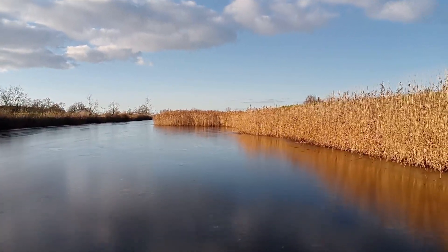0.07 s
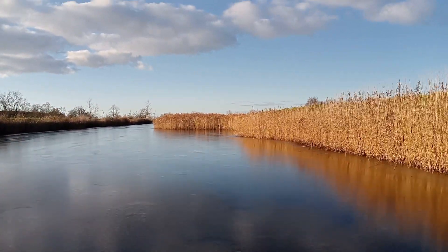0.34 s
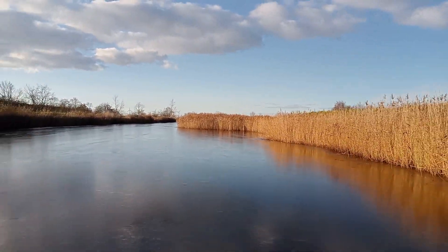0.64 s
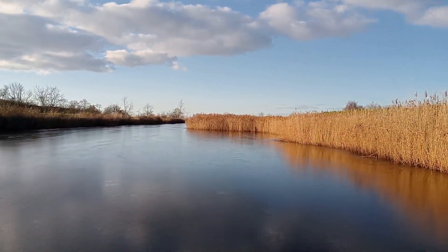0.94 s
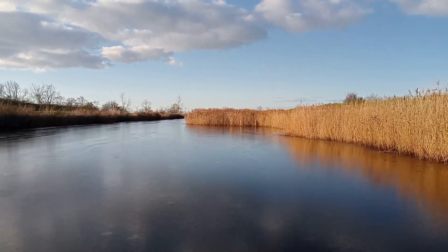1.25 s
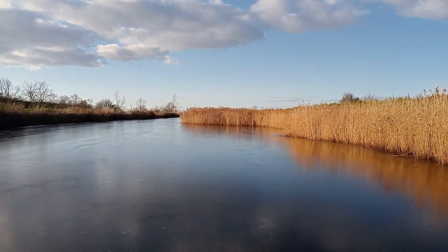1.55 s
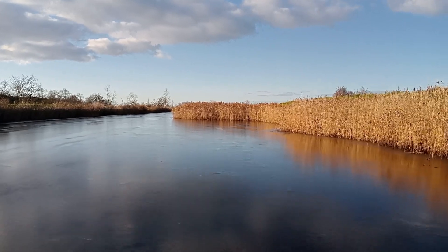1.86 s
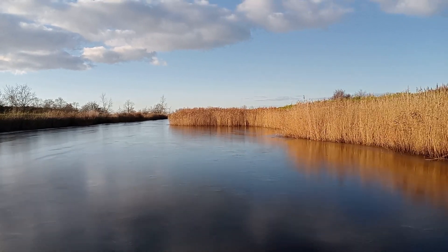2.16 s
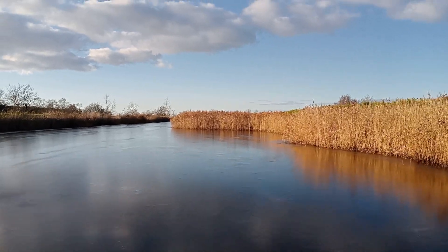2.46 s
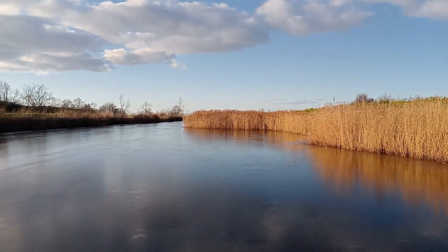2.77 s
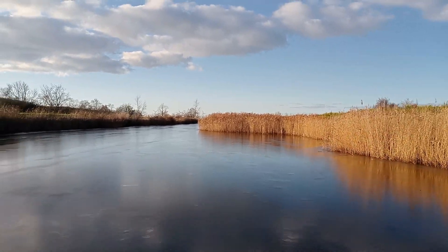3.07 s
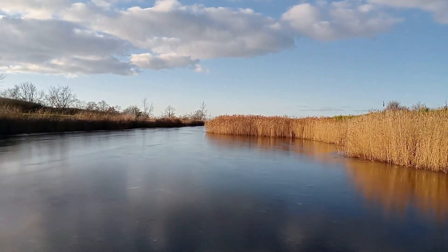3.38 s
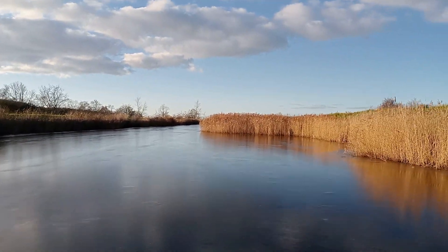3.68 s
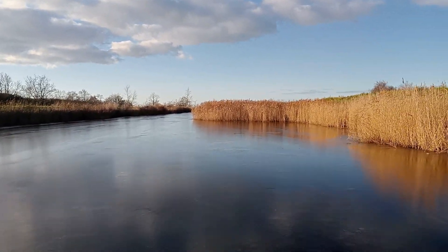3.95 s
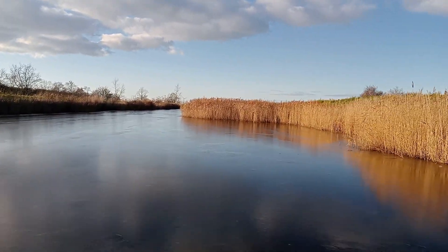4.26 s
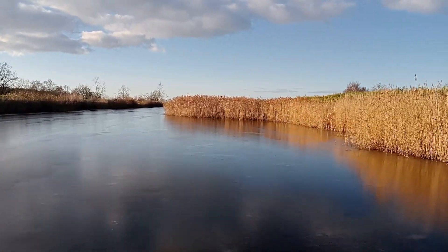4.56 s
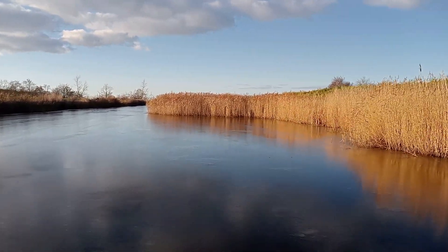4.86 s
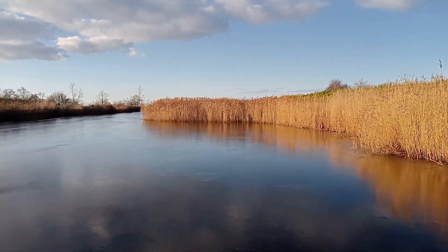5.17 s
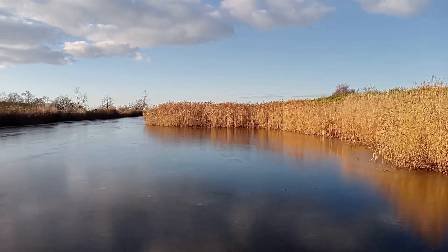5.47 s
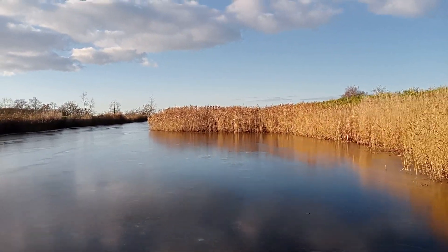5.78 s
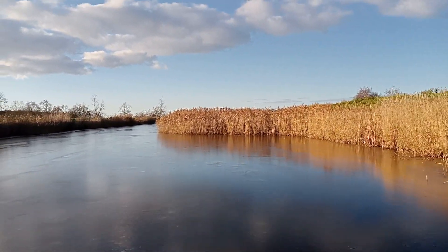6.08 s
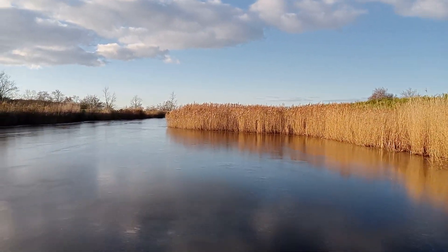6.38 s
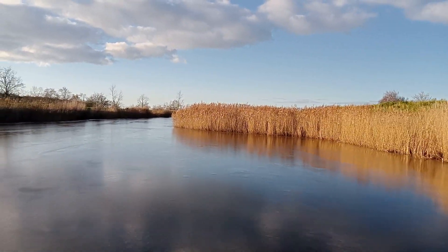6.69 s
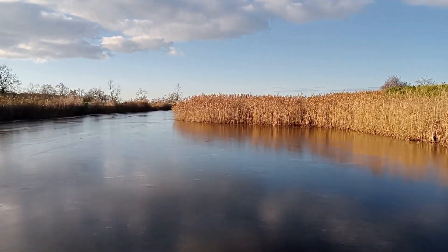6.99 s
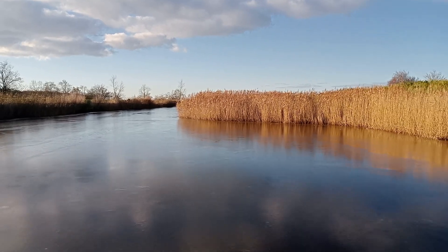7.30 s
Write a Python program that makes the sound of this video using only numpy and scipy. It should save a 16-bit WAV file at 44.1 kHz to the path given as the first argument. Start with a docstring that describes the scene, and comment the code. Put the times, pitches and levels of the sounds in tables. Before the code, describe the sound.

Ice skates travel over thin ice, heard close and without echo, with a faint gritty gliding hiss and uneven low wind rumble throughout. From the start the ice cracks in sharp snaps, each a very short falling chirp, thickest and loudest between 1.2 and 2.5 seconds. A blade rasps at about 0.5 to 0.9 seconds. The other blade chatters in a fast, ringing metallic stutter from 1.7 to 2.2 seconds. The skates clack around 2.8 seconds, followed by a lone crack, a softer rasp until 3.5 and a sharp clack at 3.7. A longer chattering push runs from 4.2 to 5.1 seconds, ending in a scrape. Clacks and one more crack come near 5.7, then a strong, crunchy rasp from 6.1 to 6.8. Sharp clacks follow at 7 and 7.3 seconds. Gusts bump the microphone around 1.2, 1.9, 3.6 and 5.1 seconds.

```python
"""Skating on thin black ice

A skater carries the microphone along a canal. The sheet cracks underfoot, and each crack arrives as
a short falling chirp because high bending waves outrun low ones. One blade chatters through its push,
gripping and slipping; the other rasps as it shaves the ice. The skates clack between strides,
the glide hisses and the airstream buffets the microphone."""
import sys
import numpy as np
from scipy import signal
from scipy.fft import rfft, irfft
from scipy.io import wavfile
from scipy.ndimage import uniform_filter1d

SR = 44100
rng = np.random.default_rng(int(sys.argv[2]) if len(sys.argv) > 2 else 0)


def put_to_file(sound):
    """Save the sound as 16-bit audio at rate SR, in the file named by the first command-line argument."""
    columns = np.atleast_2d(sound).T  # one column per channel
    safe = np.clip(columns, -1, 1)
    whole_steps = np.round(safe * 32767)
    wavfile.write(sys.argv[1], SR, whole_steps.astype(np.int16))


N = 323253
TIME = np.arange(N) / SR


def from_db(db):
    """Decibels to gain."""
    return 10 ** (np.asarray(db) / 20)


def rms_one(x):
    """Scale to unit power."""
    return x / np.sqrt(np.mean(x ** 2) + 1e-20)


def in_time(rows):
    """Each column of an automation curve at every sample."""
    times, *columns = np.transpose(rows)
    return [np.interp(TIME, times, column) for column in columns]


def during(rows, fade_s=0.01):
    """A gate that is open while a curve lasts."""
    return np.clip(np.minimum(TIME - rows[0][0], rows[-1][0] - TIME) / fade_s, 0, 1)


def held(start, end, attack_s, release_s):
    """Envelope: attack before the start, hold, release after the end."""
    attack = np.maximum(start - TIME, 0) / attack_s
    release = np.maximum(TIME - end, 0) / release_s
    return np.exp(-np.minimum(attack + release, 20))


def add(track, start_s, sound):
    """Mix a short sound into a track."""
    start = max(round(start_s * SR), 0)
    track[start:start + len(sound)] += sound[:max(N - start, 0)]


def gain_at(spectrum, hz):
    """Gain of an EQ curve, falling 20 dB per octave beyond its ends."""
    points_hz, db = np.transpose(spectrum)
    octave, points = np.log2(np.maximum(hz, 1)), np.log2(points_hz)
    beyond = np.abs(octave - np.clip(octave, points[0], points[-1]))
    return from_db(np.interp(octave, points, db) - 20 * beyond)


def colour(x, spectrum, size=4096):
    """Minimum-phase EQ that keeps the power of white noise."""
    cepstrum = irfft(np.log(gain_at(spectrum, np.fft.rfftfreq(size, 1 / SR))))
    cepstrum[1:size // 2] *= 2
    cepstrum[size // 2 + 1:] = 0
    response = irfft(np.exp(rfft(cepstrum)))
    return signal.oaconvolve(x, response / np.linalg.norm(response))[:N]


def wobble(depth_db, rate_hz):
    """A randomly wandering gain with unit power."""
    knots = rng.standard_normal(N // 20)
    drift = rms_one(np.interp(TIME * rate_hz, np.arange(len(knots)), knots))
    return rms_one(from_db(depth_db * drift))


def burst(decay_s, rise_s, size):
    """Noise that swells quickly and dies away."""
    t = np.arange(size) / SR
    return (1 - np.exp(-t / rise_s)) * np.exp(-t / decay_s) * rng.standard_normal(size)


def crumble(impulses, decay_s, rise_s=0.001):
    """The energy of each impulse breaks up into a burst of noise."""
    power = impulses ** 2
    for time_s in (rise_s, decay_s):
        pole = np.exp(-2 / (time_s * SR))
        power = signal.lfilter([1 - pole], [1, -pole], power + 1e-18)
    return np.sqrt(power) * rng.standard_normal(N)


def slip_train(per_s, unevenness, spread_db, count=4000):
    """Stick and slip: impulses at uneven gaps, with unit power."""
    timing, strength = rng.standard_normal((2, count))
    gaps = np.exp(unevenness * timing - unevenness ** 2 / 2)
    at = (np.cumsum(gaps) / per_s * SR).astype(int)
    train = np.zeros(N)
    train[at[at < N]] = from_db(spread_db * np.clip(strength, -2, 2))[at < N]
    return rms_one(train)


def wandering_contact(x, depth_db, size=256):
    """The point of contact wanders along the runner, so narrow bands swell and fade irregularly."""
    spectrum = signal.stft(x, nperseg=size)[2]
    patches = uniform_filter1d(rng.standard_normal(spectrum.shape), size=2, axis=0)
    patches = rms_one(uniform_filter1d(patches, size=70, axis=1))
    return signal.istft(spectrum * rms_one(from_db(depth_db * patches)), nperseg=size)[1][:N]


# friction bed of the gliding skate: time_s, level_db
GLIDE_LEVEL = [(0, -52), (0.9, -45.5), (1.38, -52), (2.3, -42.5), (2.58, -52.5), (2.85, -56.5),
               (3.25, -50.5), (3.5, -49), (4.05, -51), (4.3, -45), (4.6, -48), (5.2, -48.5), (5.62, -50.5),
               (5.9, -48.5), (6.55, -47.5), (7.1, -54.5), (7.33, -51.5)]
# sideways scuffs, ever harder until the blade lifts: start_s, lift_s, hiss_db, spray_db
SCUFFS = [(0.06, 0.15, -44.5, -44.5), (0.4, 0.536, -47, -51), (1.45, 1.934, -39.5, -59),
          (2.325, 2.52, -45.5, -48), (3.565, 3.893, -47, -51), (5.215, 5.55, -45, -44),
          (6.84, 7.058, -44, -56), (7.307, 7.336, -37, -30)]
# blade hiss, fine ice spray and the runner's murmur: freq_hz, gain_db
HISS_EQ = [(2500, 19), (3500, -2), (5000, 9.5), (6300, -4.5), (7300, 8), (8200, 6), (9300, 15.5),
           (10800, 4), (12500, 5.5), (15000, -70)]
SPRAY_EQ = [(6000, -4), (10000, -6), (12500, -17), (13800, -14), (15300, -14), (16000, -18)]
RUNNER_EQ = [(300, -26), (550, -10), (1000, -6), (1600, -2), (1830, 3), (1980, -2.5), (2180, -1),
             (2550, -5), (3400, -5), (6000, -19.5)]


def glide(hiss_db=-1, spray_db=-5, runner_db=5, scuff_swell_db=8.5, tick_gain=0.91):
    """Steel running on ice: a gritty hiss, with small ticks where it meets flaws in the surface."""
    bed_db = in_time(GLIDE_LEVEL)[0]
    hiss, spray, runner = (from_db(bed_db + db) for db in (hiss_db, spray_db, runner_db))
    for start_s, lift_s, db, fine_db in SCUFFS:
        still_to_go = np.clip((lift_s - TIME) / (lift_s - start_s), 0, 1)
        swell = from_db(-scuff_swell_db * still_to_go)
        scuff = swell * held(start_s, lift_s, attack_s=0.0065, release_s=0.015)
        hiss = np.hypot(hiss, scuff * from_db(db))
        spray = np.hypot(spray, scuff * from_db(fine_db))
        runner = np.hypot(runner, scuff * from_db(db + runner_db))
    flaws = slip_train(per_s=70, unevenness=0.8, spread_db=3.5)
    sound = np.zeros(N)
    for level, eq in [(hiss, HISS_EQ), (spray, SPRAY_EQ), (runner, RUNNER_EQ)]:
        friction = rng.standard_normal(N) + tick_gain * crumble(flaws, decay_s=0.0015, rise_s=0.0015)
        sound += colour(level * friction, eq)
    gritty = sound * wobble(depth_db=3, rate_hz=100)
    return wandering_contact(gritty, depth_db=3.5)


# bed of moving air between gusts: time_s, rumble_db
AIRSTREAM = [(0, -44), (0.7, -49), (1.1, -42.5), (2.2, -46.5), (2.7, -50.5), (3.1, -53), (3.6, -44.5),
             (4.3, -52.5), (4.8, -50.5), (5.3, -38.5), (6.1, -45), (6.6, -49), (7.33, -45)]
# gusts on the microphone: peak_s, swell_s, rumble_db, flutter_db
GUSTS = [(0.48, 0.026, -34, -58), (0.82, 0.014, -37, -58), (1.06, 0.013, -28.5, -52),
         (1.176, 0.016, -23, -49), (1.325, 0.036, -31, -48), (1.702, 0.032, -31.5, -38),
         (1.925, 0.033, -28, -38), (2.16, 0.12, -43.5, -41), (3.44, 0.043, -28, -50),
         (3.53, 0.03, -30.5, -58), (3.735, 0.048, -27.5, -34.5), (4.08, 0.046, -36.5, -63),
         (4.157, 0.014, -34, -35.5), (5.14, 0.048, -27, -37), (5.28, 0.059, -42, -42),
         (5.47, 0.057, -38, -52), (5.725, 0.034, -31, -37.5)]
# deep rumble and higher flutter of the air: freq_hz, gain_db
RUMBLE_EQ = [(22, -34), (40, -23), (60, -4.5), (100, 1), (155, 3.5), (220, -4), (350, -29.5), (700, -30.5)]
FLUTTER_EQ = [(110, -12.5), (190, -10.5), (270, 0), (380, -7), (520, -19), (1000, -34)]


def wind(bed_flutter_db=-7):
    """Eddies hit the microphone port in lumps; gusts swell out of the airstream and fade again."""
    rumble = from_db(in_time(AIRSTREAM)[0]) * wobble(depth_db=3.5, rate_hz=22)
    flutter = rumble * from_db(bed_flutter_db)
    for peak_s, swell_s, rumble_db, flutter_db in GUSTS:
        gust = np.exp(-np.minimum(((TIME - peak_s) / swell_s) ** 2 / 2, 20))
        rumble = np.hypot(rumble, gust * from_db(rumble_db))
        flutter = np.hypot(flutter, gust * from_db(flutter_db))
    lumps = wobble(depth_db=3.5, rate_hz=41)
    low = rumble * colour(rng.standard_normal(N), RUMBLE_EQ)
    high = flutter * colour(rng.standard_normal(N), FLUTTER_EQ)
    return lumps * (low + high)


# patches of small cracks under a loaded blade: start_s, end_s, level_db
CRACKLING = [(0.302, 2.5, -36), (0.58, 0.82, -28.5), (1.74, 2.17, -23.5)]


def faint_snaps(spread_db=4.5, tilt_db=2.5, per_patch=9):
    """Small cracks at random moments, as rows like those of ICE_SNAPS."""
    return [(rng.uniform(start_s, end_s), db + spread_db * rng.standard_normal(),
             rng.uniform(1.7, 4.42), tilt_db + rng.standard_normal(), rng.uniform(0, 2))
            for start_s, end_s, db in CRACKLING for _ in range(per_patch)]


# cracks in the sheet: arrival_s, level_db, lag_at_1khz_ms, tilt_db_per_octave, second_jump_ms
ICE_SNAPS = [(0.0173, -21.5, 2.0, -1, 1.3), (0.0696, -27, 4.3, -7, 0.49), (0.1078, -21.5, 3.7, -2, 0.22),
             (0.1412, -26, 3.6, -7, 0.34), (0.167, -22.5, 4.2, -2.5, 0.22), (0.2166, -22, 4.5, -3.5, 0.096),
             (0.2471, -15.5, 4.5, 3.5, 0.11), (0.2562, -17.5, 4.2, -1, 0.33), (0.2987, -24, 3.8, 4.5, 0.12),
             (0.3588, -19.5, 3.7, 4.5, 0.087), (0.4044, -23.5, 3.5, 5.5, 0.076),
             (0.4151, -21.5, 3.9, 1, 0.074), (0.4573, -19.5, 4.0, -1, 0.064),
             (0.5683, -14, 4.1, -4.5, 0.28), (0.5834, -13.5, 3.6, 3.5, 0.11), (0.7533, -28, 3.1, 0.5, 1.25),
             (0.7929, -22.5, 4.0, -1.5, 2.15), (0.832, -28, 3.3, 1, 0.13), (0.9062, -22.5, 3.0, 0, 1.04),
             (0.9748, -17.5, 3.5, 2, 0.13), (1.1883, -13.5, 3.7, 3.5, 0.16), (1.2025, -13.5, 3.1, 4.5, 0.1),
             (1.2503, -16, 2.7, 2.5, 0.12), (1.2645, -15.5, 2.9, 3.5, 0.073),
             (1.3084, -18.0, 2.3, 6.5, 0.074), (1.3687, -16, 2.5, 3, 0.39), (1.4344, -10.5, 5.4, 2.5, 0.9),
             (1.4647, -11, 2.6, 3, 0.1), (1.5119, -9.5, 2.8, 2, 2.1), (1.5351, -16.0, 3.3, 0.5, 1.55),
             (1.575, -14.5, 2.4, 6, 0.081), (1.5908, -14.5, 2.2, 4.5, 0.1), (1.6044, -20, 2.5, 5.5, 0.43),
             (1.7206, -10.5, 3.2, 4.5, 0.25), (1.7333, -9.5, 2.6, 1.5, 0.21), (1.7782, -19.0, 3.0, 4, 0.14),
             (1.8373, -17.5, 2.9, 3, 0.22), (1.926, -24, 2.2, -1, 0.3), (2.0051, -15.5, 2.0, 4, 0.26),
             (2.0283, -14.5, 3.6, 5, 1.35), (2.1959, -14, 3.0, 4.0, 0.14), (2.2302, -14.5, 2.4, 2.5, 0.16),
             (2.2622, -13.5, 2.3, -0.5, 0.9), (2.2881, -18.5, 4.6, 2.5, 0.17), (2.3336, -16, 3.0, 2.5, 1.9),
             (2.4495, -11.0, 3.1, 2.5, 1.25), (2.4669, -18, 4.2, 2.5, 0.3), (2.5078, -18.5, 3.2, 3, 0.38),
             (3.1075, -12, 3.6, 1.5, 0.42), (3.1138, -20.5, 5.0, 0.5, 0.43), (5.7181, -15, 5.2, -4.5, 0.51)]
# tone radiated by the ice sheet: freq_hz, gain_db
SHEET_EQ = [(250, -35), (480, -14), (700, -1.5), (1100, 8), (2000, 0.5), (3000, -8), (5000, -17.5),
            (8000, -29), (15000, -43)]
# crisp top of ice splinters and skate clacks: freq_hz, gain_db
CRISP_EQ = [(2000, -3), (4500, 9.5), (6500, -1), (9300, 11.5), (12000, 0), (15500, -3)]


def cracks(dispersion=0.4, pivot_hz=1400, jump_gain=0.47, echo_gain=0.21, longest_echo_s=0.003465,
           splinter_db=-23, size=2048):
    """Bending waves in floating ice run faster the higher they are: a snap lands as a falling chirp."""
    chirps, splinters = np.zeros((2, N))
    hz = np.fft.rfftfreq(size, 1 / SR)
    octaves = np.log2(np.maximum(hz, 600) / pivot_hz)
    for arrival_s, db, lag_ms, tilt_db, jump_ms in list(ICE_SNAPS) + faint_snaps():
        tone = gain_at(SHEET_EQ, hz) * from_db(tilt_db * octaves)
        travel = np.exp(-2j * np.pi * lag_ms / dispersion * (hz / 1000) ** dispersion)
        # the crack runs on in a second, weaker jump
        jumps = 1 + jump_gain * np.exp(-2j * np.pi * hz * jump_ms / 1000)
        # a flaw in the sheet sends back a faint echo
        echo = 1 + echo_gain * np.exp(-2j * np.pi * hz * longest_echo_s * rng.uniform(0.5, 1))
        chirp = irfft(tone * travel * jumps * echo)
        chirp *= np.sqrt(0.005 * SR) / np.linalg.norm(chirp)  # the energy of 5 ms at unit power
        start_s = arrival_s - lag_ms / 1000 * 1.5 ** (dispersion - 1)  # 1.5 kHz lands on the cue
        add(chirps, start_s, from_db(db) * chirp)
        splinter = burst(decay_s=0.0062, rise_s=0.00039, size=size)
        add(splinters, start_s, from_db(db + splinter_db) * splinter)
    return chirps + colour(splinters, CRISP_EQ)


# strokes of the rasping blade, one curve per push: time_s, level_db, bite_db
RASP_PUSHES = [
    [(0.12, -51, -8), (0.44, -39.5, 0), (0.61, -28.5, -7.5), (0.69, -26.5, -10.5), (0.92, -52, 0)],
    [(2.96, -40.5, -2), (3.1, -37, -1), (3.27, -31.5, -7), (3.48, -37.5, -2)],
    [(5.93, -51, -12), (6.06, -39, -19), (6.17, -25.5, -6.5), (6.32, -29, -3), (6.47, -26.5, 0),
     (6.58, -27, 1), (6.73, -24.5, -0.5), (6.85, -43, 5)],
]
# its loudest crunches: start_s, level_db
CRUNCHES = [(0.694, -7), (0.771, -12.5), (6.199, -4.5), (6.2843, -5.5), (6.3702, -2), (6.4473, -5),
            (6.4833, 0.5), (6.507, -2), (6.5541, 3), (6.5831, 1.5), (6.693, -10), (6.7137, -7),
            (6.7474, 2.5), (6.8076, -7)]
# its body, its biting edge and the dull grind of either blade digging in: freq_hz, gain_db
RASP_BODY_EQ = [(200, -26.5), (550, -15.5), (920, -1.5), (1100, -5), (1320, 6.5), (1550, 2), (1800, 8),
                (2000, -6.5), (2230, 5.5), (3000, -19), (4000, -34), (6400, -63), (8700, -11), (14000, -83)]
RASP_EDGE_EQ = [(1200, -11.5), (2200, -3), (2650, 5), (3050, 0), (3380, -1), (3950, -11.5), (4400, -7.5),
                (5300, -12), (6500, -30), (7100, -19), (7800, -24), (8700, -18), (10500, -21.5),
                (14000, -52)]
GRIND_EQ = [(170, -15), (280, 1), (400, -1), (560, -4.5), (900, -5)]


def rasp(edge_db=-1, full_push_db=-28, crunch_db=-7.5, grind_db=-13.5, grain_s=0.0016, smooth_gain=0.35,
         ring_hz=1810, ring_q=75, ring_db=-4):
    """One blade shaves the ice in dense grains; a harder bite brings out its upper resonances."""
    body, edge, crunches = np.zeros((3, N))
    for push in RASP_PUSHES:
        db, bite_db = in_time(push)
        pressure_db = 0.5 * (db - full_push_db)
        body += during(push) * from_db(db)
        edge += during(push) * from_db(db + edge_db + bite_db + pressure_db)
    for start_s, db in CRUNCHES:
        add(crunches, start_s, from_db(db + crunch_db) * burst(grain_s, rise_s=0.00022, size=600))
    grains = slip_train(per_s=200, unevenness=0.55, spread_db=-0.5)
    body *= crumble(grains, grain_s) + smooth_gain * rng.standard_normal(N)
    edge *= crumble(grains, grain_s) + smooth_gain * rng.standard_normal(N)
    sound = colour(body + crunches, RASP_BODY_EQ) + colour(edge + 0.83 * crunches, RASP_EDGE_EQ)
    sound += from_db(grind_db) * colour(edge, GRIND_EQ)
    # a sharp mode of the runner sings along
    ring = signal.lfilter(*signal.iirpeak(ring_hz, ring_q, fs=SR), sound)
    return wandering_contact(sound + from_db(ring_db) * ring, depth_db=3.5)


# clacks of the skates: start_s, level_db, treble_offset_db, knock_offset_db, decay_s
CLACKS = [(0.487, -15.5, -18, -34, 0.0078), (1.14, -19.5, -10, -7, 0.0098), (1.28, -11, -24, -29, 0.0028),
          (2.701, -21, -31, -45, 0.0037), (2.777, -25, -37, -6, 0.0052), (2.861, -10.5, -25, -2.5, 0.0024),
          (2.891, -23, -22, -39, 0.005), (2.944, -22, -23, -36, 0.0055), (3.03, -15.5, -21, -26, 0.0026),
          (3.412, -13, -44, -38, 0.0026), (3.679, -5.5, -15.5, -15, 0.0028), (3.934, -11, -16, -19, 0.0042),
          (4.165, -12, -20, -37, 0.0035), (5.714, -8, -25.5, -30, 0.0037), (5.748, -17.5, -22, -11, 0.0028),
          (5.834, -19.5, -11, -14, 0.0042), (5.868, -17.5, -20, -11, 0.0038),
          (5.916, -17, -22, -18, 0.0025), (6.032, -15.5, -19, -16, 0.0024), (6.868, -14.5, -23, -9, 0.0023),
          (6.935, -16, -36, -22, 0.0029), (7.015, -6, -18.5, -16, 0.0028), (7.29, -8, -6.5, -37, 0.0017),
          (7.301, -22.5, -11, -43, 0.006)]
# body and dull knock of a clack: freq_hz, gain_db
CLACK_BODY_EQ = [(200, -4), (500, -7.5), (1000, -2.5), (1850, 6.5), (2600, -4), (3700, -7), (6000, -16.5),
                 (14000, -39)]
CLACK_KNOCK_EQ = [(120, -27), (300, 2), (480, -3), (800, -16.5), (1500, -29)]


def clacks(body_db=-3, top_db=8.5, knock_db=-2, rise_s=0.00079, top_rise_s=0.00065, top_lead_s=0.0005,
           size=1500):
    """A skate touches down or its parts knock together: a brief, bright rattle over a dull knock."""
    body, top, knock = np.zeros((3, N))
    for start_s, db, treble_db, low_db, decay_s in list(CLACKS) + rattles():
        add(body, start_s, from_db(db + body_db) * burst(decay_s, rise_s, size))
        click = from_db(db + treble_db + top_db) * burst(decay_s, top_rise_s, size)
        add(top, start_s - top_lead_s, click)
        add(knock, start_s, from_db(db + low_db + knock_db) * burst(decay_s, rise_s, size))
    return colour(body, CLACK_BODY_EQ) + colour(top, CRISP_EQ) + colour(knock, CLACK_KNOCK_EQ)


# modes of the chattering blade: pitch_hz, width_hz, level_db
BLADE_MODES = [(1040, 206, -17), (1410, 236, -12.5), (1933, 83, -2), (2300, 73, -4), (2900, 150, -0.5),
               (3505, 251, 6), (3682, 406, 1), (4610, 230, -8.5), (5290, 470, -13), (6880, 810, -22),
               (8160, 1500, -22.5)]


def blade_ring(force):
    """A force rings the steel runner's damped modes, summed in alternating polarity."""
    t = np.arange(2048) / SR
    response = np.zeros_like(t)
    for k, (pitch_hz, width_hz, db) in enumerate(BLADE_MODES):
        mode = width_hz * np.exp(-np.pi * width_hz * t) * np.sin(2 * np.pi * pitch_hz * t)
        response += (-1) ** k * from_db(db) * mode
    return signal.oaconvolve(force, response / np.linalg.norm(response))[:N]


# strokes of the chattering blade, one curve per push: time_s, slips_per_s, slip_db, scrape_db
CHATTER_PUSHES = [
    [(1.67, 31.7, -36, -66), (1.76, 64.4, -16, -53), (1.85, 118, -12, -44), (1.94, 131, -15, -40),
     (2.11, 125, -12.5, -31), (2.18, 110, -26.5, -28)],
    [(4.17, 85.6, -29, -51), (4.29, 91, -25, -73), (4.34, 40.8, -19, -70), (4.42, 88.6, -17.5, -54),
     (4.52, 52, -16.5, -64), (4.69, 48, -17, -69), (4.8, 107, -16, -67), (4.92, 138, -13, -30.5),
     (5.05, 139, -14, -28.5), (5.125, 94, -33.5, -46)],
]
# its hardest slips: start_s, level_db
HARD_SLIPS = [(1.6737, -20.5), (1.8412, -6.5), (1.9592, -7.5), (2.098, -5.5), (4.3869, -17), (4.492, -16.5),
              (4.621, -16.5), (4.662, -11), (4.7533, -11)]


def chatter(strike_db=17, grit_db=1, scrape_db=1.5, grind_db=-9.5, grit_lead_s=0.0003, contact_hz=10500):
    """The other blade grips and lets go; each slip strikes the steel and crushes a little ice."""
    force = np.zeros(N)
    for start_s, db in list(HARD_SLIPS) + [slip for push in CHATTER_PUSHES for slip in slips(push)]:
        add(force, start_s, from_db([db + strike_db]))
        grit = burst(decay_s=0.002, rise_s=0.00059, size=600)
        add(force, start_s - grit_lead_s, from_db(db + grit_db) * grit)
    scrape_level = sum(during(push) * from_db(in_time(push)[2] + scrape_db) for push in CHATTER_PUSHES)
    small_slips = slip_train(per_s=160, unevenness=0.55, spread_db=3)
    scrape = scrape_level * crumble(small_slips, decay_s=0.0009)
    # the ice yields, which softens each blow
    softened = signal.sosfilt(signal.butter(2, contact_hz, fs=SR, output="sos"), force + scrape)
    ringing = wandering_contact(blade_ring(softened), depth_db=2.1)
    return ringing + from_db(grind_db) * colour(scrape, GRIND_EQ)


def slips(push, unevenness=0.22, spread_db=1, clear_s=0.007, count=130):
    """Slips follow the rate and level of a push, a little unevenly; rows of start_s, level_db."""
    per_s, db, _ = in_time(push)
    cycles = np.cumsum(per_s * during(push)) / SR
    jitter, strength = np.clip(rng.standard_normal((2, count)), -2, 2)
    marks = np.arange(count) + 0.5 + unevenness * jitter
    due = (marks > 0) & (marks < cycles[-1])
    start_s = np.interp(marks[due], cycles, TIME)
    level_db = np.interp(start_s, TIME, db) + spread_db * strength[due]
    # no other slip falls within a few milliseconds of a hard slip
    apart = np.abs(start_s[:, None] - np.array(HARD_SLIPS)[:, 0]).min(axis=1) > clear_s
    return list(zip(start_s[apart], level_db[apart]))


# forward swings of a skate: start_s, end_s
SWINGS = [(2.7, 3.05), (5.722, 6.07), (6.95, 7.2)]


def rattles(level_db=-25, spread_db=6, treble_db=-19, knock_db=-24, decay_s=0.0023, per_swing=5):
    """A swinging skate rattles faintly at random moments, as rows like those of CLACKS."""
    return [(rng.uniform(start_s, end_s), level_db + spread_db * rng.standard_normal(),
             treble_db, knock_db, decay_s) for start_s, end_s in SWINGS for _ in range(per_swing)]


def scene(mic_hiss_db=-60.5):
    """Open ice gives no reverb: all sources reach the microphone dry, in mono."""
    mic_hiss = from_db(mic_hiss_db) * rng.standard_normal(N)
    return (cracks() + chatter() + rasp() + clacks() + glide() + wind() + mic_hiss)[None, :]


def record(dry, ceiling=0.9, cutoff_hz=15700):
    """Peaks are clipped, then a steep low-pass cuts the very top."""
    clipped = np.clip(dry, -ceiling, ceiling)
    return signal.sosfilt(signal.ellip(10, 0.2, 80, cutoff_hz, fs=SR, output="sos"), clipped)


dry = scene()
out = record(dry)
put_to_file(out)
```